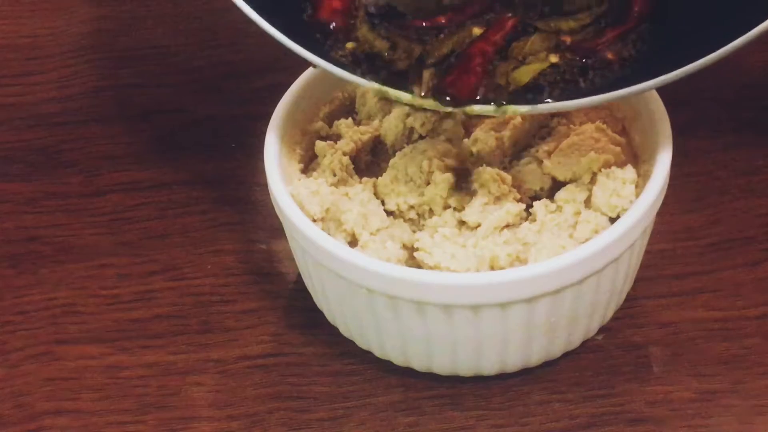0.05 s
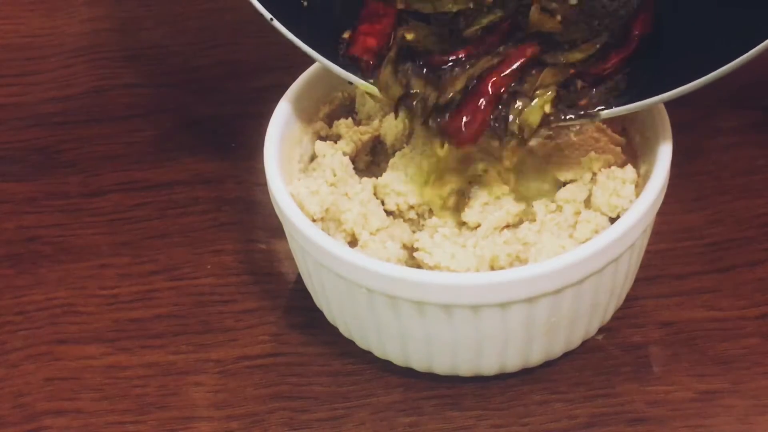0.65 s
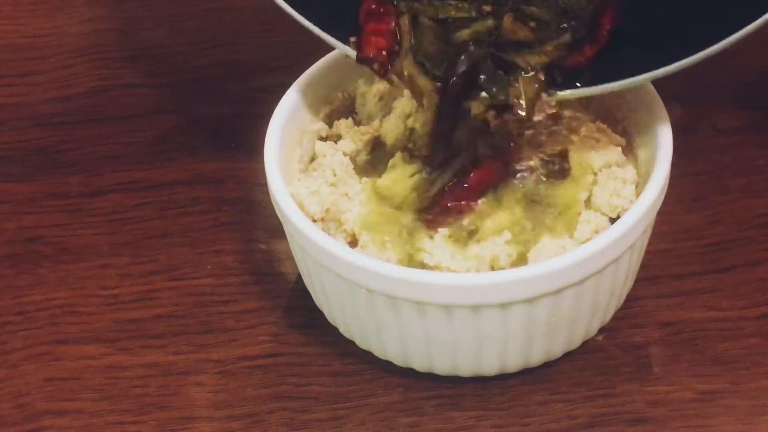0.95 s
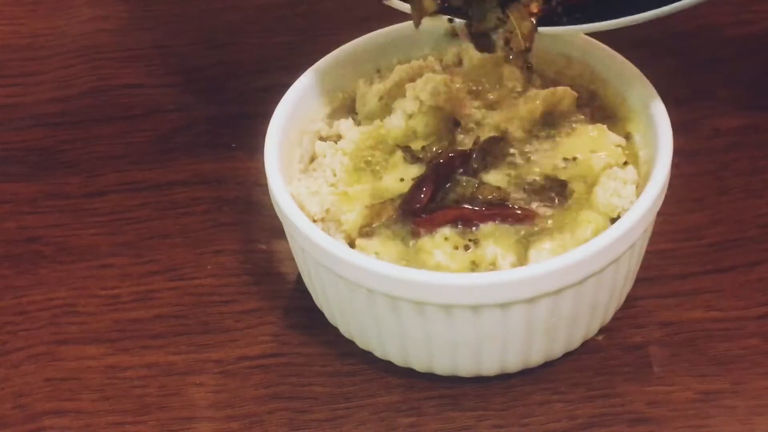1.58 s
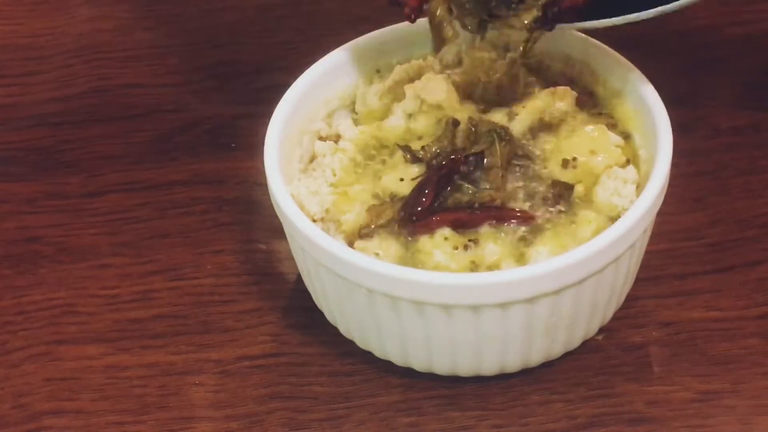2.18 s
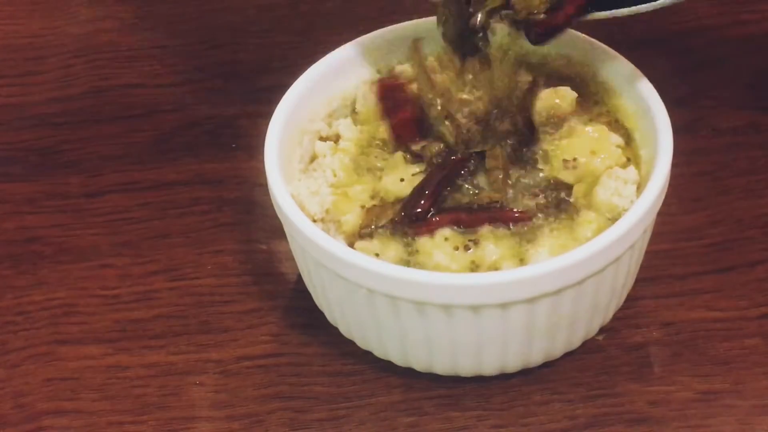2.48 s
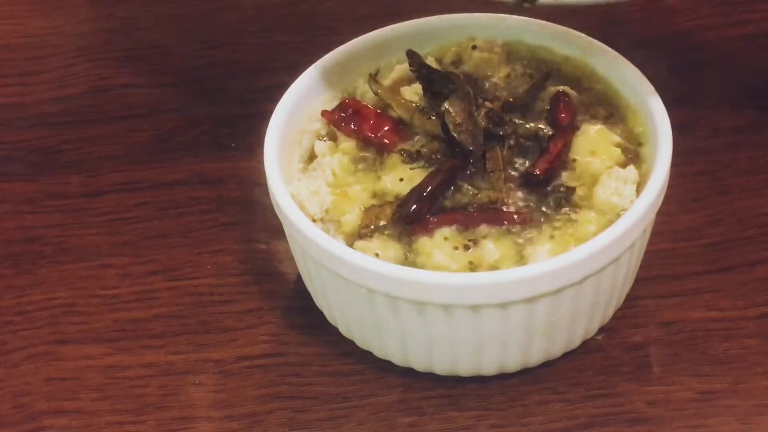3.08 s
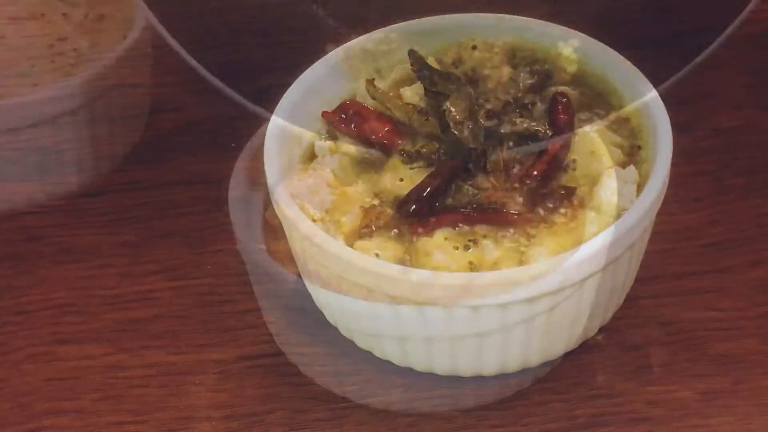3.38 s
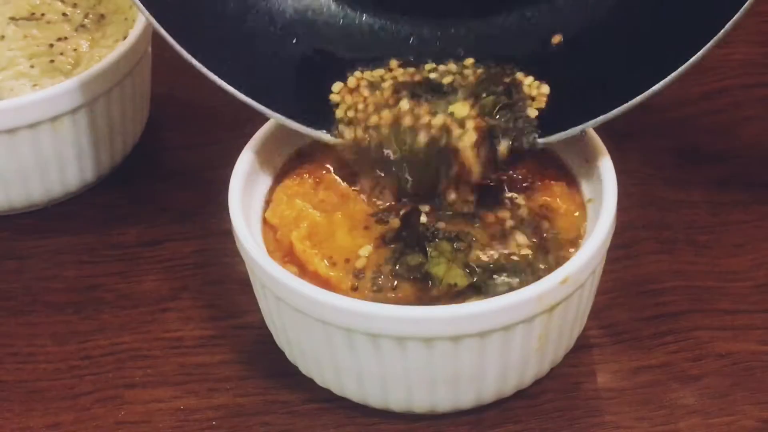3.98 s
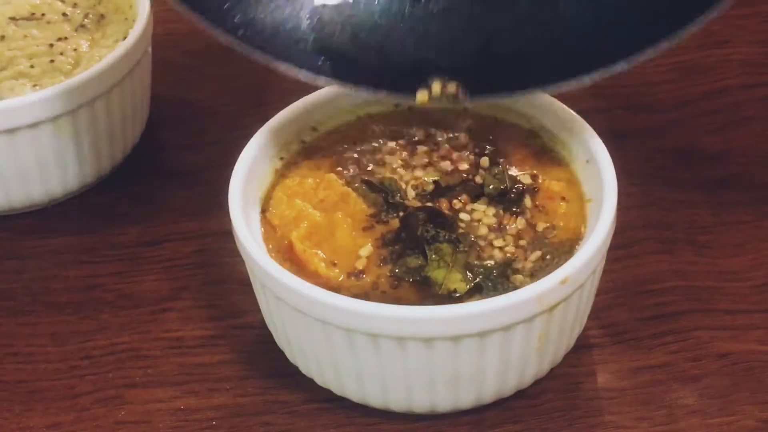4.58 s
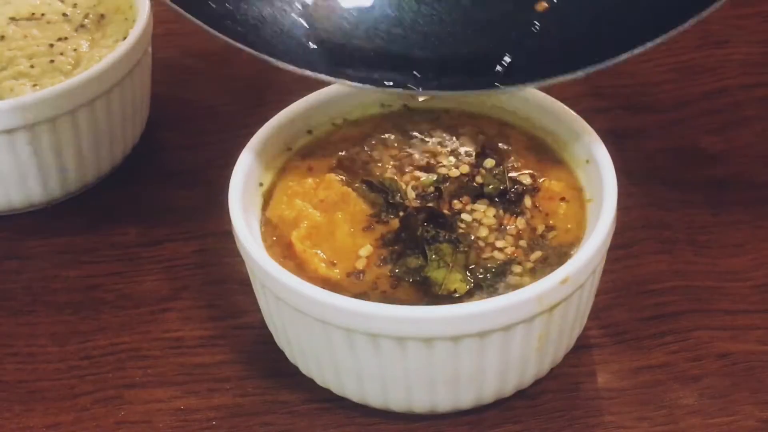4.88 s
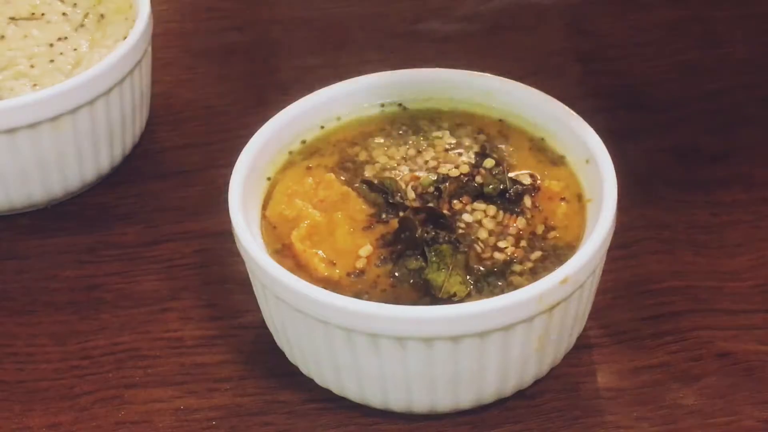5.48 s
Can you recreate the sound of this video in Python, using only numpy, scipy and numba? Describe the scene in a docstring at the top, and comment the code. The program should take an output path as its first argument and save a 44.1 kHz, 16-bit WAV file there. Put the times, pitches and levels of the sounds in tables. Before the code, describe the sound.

Hot oil and spices hit moist chutney with a fierce hiss, surging several times as tiny bubbles crackle and larger drops pop. A few dull knocks on the table come about halfway through. The sizzling carries on as a second small bowl gets its oil, with a slightly hollow ring under the pan, then dies down to scattered spitting. The microphone is close, with low kitchen room noise behind.

```python
"""Kitchen, close up: hot spiced oil is tipped from a pan onto wet chutney in one small bowl, then another.
Water flashes to steam in thousands of tiny bursts that thin to a crackle as the oil cools.
Larger drops spit; the hollow of the bowl and the air gap under the pan ring with the bubbles.
The pan drones as spices slide off and something bumps the table.
Low room noise lies behind it all, with an appliance hum during the second pour."""
import sys
import numpy as np
from scipy import signal
from scipy.fft import rfft, irfft
from scipy.io import wavfile
from scipy.ndimage import uniform_filter1d
from numba import njit

SR = 44100
rng = np.random.default_rng(int(sys.argv[2]) if len(sys.argv) > 2 else 0)


def waveform_to_disk(signal):
    """Save audio, clipped to [-1, 1], as 16-bit WAV at the path in sys.argv[1]."""
    frames = np.transpose(np.atleast_2d(signal))
    scaled = np.clip(frames, -1, 1) * 32767
    samples = np.round(scaled).astype(np.int16)
    wavfile.write(sys.argv[1], SR, samples)


N = 244490
T = np.arange(N) / SR
STEADY_BOIL_DB = -25  # reference for burst rate and treble
# how low the pan hangs over the bowl: (time [s], cover [0-1])
PAN_COVER = [(0.1, 0), (0.45, 0.06), (0.9, 0.25), (1.6, 0.08), (3.0, 0.45), (3.43, 0.57), (3.8, 0.5),
             (4.1, 0.87), (4.18, 0.93), (4.5, 1), (4.56, 0.34), (5.5, 0.33)]


def undb(db):
    """Decibels to gain."""
    return 10 ** (np.asarray(db) / 20)


def unit(x):
    """Scale to rms 1."""
    return x / np.sqrt(np.mean(x ** 2))


def convolve(x, response):
    """Apply an impulse response."""
    return signal.fftconvolve(x, response)[:N]


def colour(x, points, size=8192):
    """Minimum-phase filter through (frequency [Hz], gain [dB]) points."""
    hz, db = np.transpose(points)
    log_gain = np.log(undb(np.interp(np.log(np.fft.rfftfreq(size, 1 / SR) + 1), np.log(hz), db)))
    cepstrum = irfft(log_gain)[:size // 2]
    cepstrum[1:] *= 2
    return convolve(x, irfft(np.exp(rfft(cepstrum, size))))


def resonate(x, modes):
    """Parallel resonances: (centre [Hz], width [Hz], gain [dB])."""
    return sum(undb(db) * signal.lfilter(*signal.iirpeak(hz, hz / width_hz, fs=SR), x)
               for hz, width_hz, db in modes)


@njit
def sweep(x, hz, width_hz):
    """Moving resonance, gain 1 at its centre."""
    y, band, low = np.empty(len(x)), 0., 0.
    for i in range(len(x)):
        g, damping = np.tan(np.pi * hz[i] / SR), width_hz[i] / hz[i]
        v = (band + g * (x[i] - low)) / (1 + g * (g + damping))
        band, low, y[i] = 2 * v - band, low + 2 * g * v, damping * v
    return y


def walk(rate_hz):
    """Smooth random drift, spread near 1."""
    knots = rng.standard_normal(4096)
    return 1.2 * np.interp(T * rate_hz, np.arange(len(knots)), knots)


def flare(start_s, db, rise_s, decay_db_per_s):
    """Power envelope: swell, then exponential decay."""
    age_s = T - start_s
    return (np.clip(age_s / rise_s, 0, 1) * undb(db - decay_db_per_s * np.maximum(age_s - rise_s, 0))) ** 2


def background(second):
    """Low room noise; an appliance hums during the second pour."""
    # room noise spectrum in each pour: (frequency [Hz], gain [dB])
    first_spectrum = [(20, -10), (55, -1.5), (100, -5.5), (142, 5), (175, -1.5), (240, -5.5), (290, 3),
                      (370, -9), (440, -2), (650, -16.5), (1200, -18), (2500, -30), (7000, -23),
                      (15000, -38)]
    second_spectrum = [(20, -15), (70, 2), (115, -2.5), (170, -6), (250, -7.5), (340, -10.5), (450, -17),
                       (650, -16.5), (1200, -40)]
    first_air = undb(-46) * unit(colour(rng.standard_normal(N), first_spectrum))
    second_air = undb(-52) * unit(colour(rng.standard_normal(N), second_spectrum))
    hum_hz, hum_db = 117.7, -50.5
    hum = undb(hum_db + .33 * walk(8)) * unit(np.sin(2 * np.pi * hum_hz * T))
    return np.sqrt(1 - second) * first_air + np.sqrt(second) * (second_air + hum)


def drain_db(start_s):
    """Once the pour that fed a splash ends, its boil drops, then soaks away."""
    pour_ends_s = (3.096, 4.411)
    drop_db, drop_s, soak_db_per_s = 2.5, .1, 1.5
    end_s = min([s for s in pour_ends_s if s > start_s], default=np.inf)
    unfed_s = np.maximum(T - end_s, 0)
    return -drop_db * np.minimum(unfed_s / drop_s, 1) - soak_db_per_s * unfed_s


def boil():
    """Each splash of oil boils up and cools; returns fizz, mid and large bubble levels in dB."""
    # oil splashes: (time [s], fizz [dB], rise [s], cooling [dB/s], mid [dB re fizz], large [dB re fizz])
    splashes = [(0.098, -26, 0.079, 151, -10, -17.6), (0.223, -21.5, .13, 3, -7.5, -13.5),
                (0.572, -30, 0.14, 21, 2.5, -2.4), (0.759, -17.2, 0.12, 65, -10, -23),
                (0.858, -23.5, .025, 54, -2, -6), (0.895, -21, 0.2, 11.5, -9, -12.5),
                (2.05, -28.5, .19, 10, -6.2, -7.5), (2.487, -28, .13, 10.5, -7, -11),
                (2.923, -26.5, 0.12, 16, -13.5, -12), (3.47, -26.9, 0.49, 9.5, -10.5, -16.5),
                (4.108, -25, .04, 15, -6, -15), (4.287, -27.5, 0.13, 27, -13, -10),
                (4.573, -30.4, 0.068, 50, -15, -8), (4.741, -31.9, 0.09, 52, -10, -14.7),
                (5.02, -37.5, .05, 4.5, -9.5, -13)]
    lag_s = .042  # bigger bubbles build up more slowly
    power = np.zeros((3, N))
    for start_s, db, rise_s, cooling, mid_db, large_db in splashes:
        level_db = db + drain_db(start_s)
        power[0] += flare(start_s, level_db, rise_s, cooling)
        power[1:] += undb([[mid_db], [large_db]]) ** 2 * flare(start_s, level_db, rise_s + lag_s, cooling)
    return 10 * np.log10(power + 1e-12)


@njit
def pops(start_s, hz, cycles, size):
    """Each pop is a sine that falls to 1/e in its number of cycles."""
    out = np.zeros(N)
    for k in range(len(start_s)):
        first, z = int(start_s[k] * SR), size[k] + 0j
        pole = np.exp((2j * np.pi - 1 / cycles[k]) * hz[k] / SR)
        for i in range(first, min(N, first + int(6 * cycles[k] * SR / hz[k]))):
            z *= pole
            out[i] += z.imag
    return out


def steam(x, db, decay_s):
    """Hiss that follows the power of the pops and dies away after them."""
    pole = np.exp(-1 / (decay_s * SR))
    power = signal.lfilter([1 - pole], [1, -pole], x ** 2)
    return undb(db) * np.sqrt(power) * rng.standard_normal(N)


def bursts(fizz_db, low_hz, high_hz, share, cycles, spread_db, steam_db, count=70000):
    """Random bubbles with steam, many small, few large; denser in a fierce boil, at level mean power."""
    when, chance, pitch, ring, size_rank = rng.random((count, 5)).T
    start_s = when * T[-1]
    rate_per_s = share * 5200 * undb(np.interp(start_s, T, fizz_db) - STEADY_BOIL_DB) ** 1.55
    alive = chance < np.minimum(rate_per_s * T[-1] / count, share)
    hz = low_hz + (high_hz - low_hz) * pitch
    ring_cycles = cycles * 2 ** (4 * ring - 2)
    size = undb(-spread_db * np.log(size_rank + .028)) * np.sqrt(hz / ring_cycles)
    x = pops(start_s[alive], hz[alive], ring_cycles[alive], size[alive])
    x = x + steam(x, steam_db, decay_s=.006)
    power = uniform_filter1d(x ** 2, size=3500)
    return x / np.sqrt(np.abs(power) + np.mean(power) / 1000)


def sizzle(second, fizz_db, mid_db, large_db):
    """Bubbles crackle and boil in spurts; the largest ring the hollow of the bowl."""
    # spectra of fine, mid and large bubbles: (frequency [Hz], gain [dB])
    fizz_spectrum = [(3500, -32), (4900, -22), (5600, -7), (6500, 0), (7100, -1), (7650, -3), (8600, -2),
                     (9700, -3), (10400, -7.5), (11200, -5), (12800, -3.5), (15800, -5.5)]
    mid_spectrum = [(1500, -38.5), (2300, -6.5), (2800, -6), (3200, 0.5), (3650, -0.5), (4150, 1.5),
                    (4600, 0), (5100, -2.5), (6500, -25)]
    large_spectrum = [(40, -40), (150, -31), (350, -15.5), (800, -11.5), (1350, -8.5), (1700, -9),
                      (2600, -1), (3100, -6), (5000, -36.5)]
    # hollow of each bowl: (centre [Hz], width [Hz], gain [dB])
    first_modes = [(694, 55, -11), (1020, 35, -4), (1725, 140, 2), (1949, 37, 4)]
    second_modes = [(685, 51, -14), (1474, 14, -5), (1684, 54, -5)]
    crackle = bursts(fizz_db, 2250, 16200, share=.9, cycles=1., spread_db=5., steam_db=-2.5)
    ringing = undb(-5.5) * bursts(fizz_db, 2500, 12056, share=.5, cycles=13.5, spread_db=4.5, steam_db=-3)
    fizz = unit(colour(crackle + ringing, fizz_spectrum))
    # a fierce boil is duller, the second bowl brighter
    treble_db = np.minimum(.52 * (STEADY_BOIL_DB - fizz_db), 1.8) + .6 * second
    treble = signal.sosfiltfilt(signal.butter(4, 10000, "highpass", fs=SR, output="sos"), fizz)
    fizz = fizz + (undb(treble_db) - 1) * treble
    mid = unit(colour(1.14 * crackle + ringing, mid_spectrum))
    large = bursts(fizz_db, 290, 3290, share=.45, cycles=1.57, spread_db=2., steam_db=3.5)
    gurgle = colour(large, large_spectrum)
    first_bowl = undb(-1.5) * unit(gurgle + resonate(large, first_modes))
    second_bowl = undb(-3) * unit(gurgle + resonate(large, second_modes))
    hollow = (1 - second) * first_bowl + second * second_bowl
    spurts_db = .5 * walk(45)
    return undb(spurts_db) * (undb(fizz_db) * fizz + undb(mid_db) * mid + undb(large_db) * hollow)


def air_gap(second, fizz_db, large_db):
    """Bubbles and froth ring the air between pan and bowl, higher and louder as the pan comes down."""
    # collapsing froth clumps: (time [s], level [dB], rise [s], decay [dB/s])
    clumps = [(0.17, -46, .05, 30), (0.32, -30, 0.12, 38), (3.414, -38.5, 0.011, 133),
              (4.135, -38, .03, 31), (4.53, -48, 0.026, 20), (5.34, -48.5, 0.05, 99.5)]
    cover = np.interp(T, *np.transpose(PAN_COVER))
    power = undb(large_db - 14.5 + 14 * cover) ** 2 + sum(flare(*clump) for clump in clumps)
    froth = bursts(fizz_db, 1000, 3100, share=.44, cycles=1., spread_db=2.5, steam_db=-7)
    open_hz = np.interp(second, [0, 1], [1756, 1395])
    hz = (open_hz + 905 * cover) * (1 + .025 * walk(60))
    width_hz = 290 + 400 * cover
    ring = sweep(sweep(froth, hz, width_hz), hz, width_hz) / np.sqrt(width_hz)
    return unit(ring) * np.sqrt(power) * undb(1.1 * walk(35))


def under_pan(x):
    """A low pan throws back a short echo and shuts in a ringing space."""
    # upper resonances under the pan: (centre [Hz], width [Hz], gain [dB])
    modes = [(3200, 280, -12.5), (5960, 370, -19), (8400, 880, -9.5)]
    cover = np.interp(T, *np.transpose(PAN_COVER))
    delay_s = .000395
    echo = -.2 * np.interp(T - delay_s, T, x)
    return (x + cover * (echo + resonate(x, modes))) * undb(-.9 * cover)


def kitchen_reverb(x, tail_db, t60_s):
    """Add the faint tail of the room."""
    t = T[:SR // 2]
    tail = rng.standard_normal(len(t)) * undb(-60 * t / t60_s) * (t > .006)
    return x + convolve(x, undb(tail_db) * tail / np.linalg.norm(tail))


def spits():
    """Larger water drops burst singly, each with a puff of steam."""
    # bursting drops: (time [s], level [dB], pitch [Hz], decay [cycles])
    drops = [(0.139, -14, 12700, 7.4), (0.235, -25, 2760, 6), (0.291, -12.5, 5350, 18),
             (0.2907, -13, 4090, 17), (0.3405, -19, 2960, 4.2), (1.9194, -9, 6230, 6),
             (1.9766, -0.5, 10500, 1.1), (2.24, -15, 4050, 3.8), (2.269, -10, 6490, 4),
             (2.3494, -12, 9140, 3.3), (2.378, -10.5, 7600, 1.8), (2.7238, -8.5, 7060, 8.6),
             (2.7657, -5.5, 7500, 3), (3.308, -12, 8700, 5.1), (3.478, -21, 6700, 8),
             (3.576, -21.5, 4860, 6.2), (3.594, -25, 4300, 7.2), (3.8190, -11, 6080, 17),
             (4.113, -20, 1084, 0.4), (4.135, -6, 7200, 3.1), (4.733, -27, 950, 0.64),
             (4.7745, -13, 6260, 3.8), (4.8035, -18, 3320, 3), (5.0045, -12.5, 6900, 4.2),
             (5.1901, -10, 10400, 4.6), (5.207, -19, 7000, 4.9), (5.2518, -14, 8950, 7.9),
             (5.2700, -15, 7600, 2.5), (5.36, -17, 8800, 4), (5.4037, -13, 13200, 7),
             (5.4565, -19, 6530, 4), (5.5247, -14.5, 7840, 3.8)]
    # steam spectrum: (frequency [Hz], gain [dB])
    puff_spectrum = [(800, -44), (1800, -34), (3500, -5.5), (7000, .5), (15000, -10)]
    start_s, db, hz, cycles = np.array(drops, float).T.copy()
    snaps = pops(start_s, hz, cycles, undb(db))
    return snaps + colour(steam(snaps, db=-1, decay_s=.0012), puff_spectrum)


def pan_drone():
    """The pan's lowest mode swells and fades as each lot of spices slides over it."""
    # spice slides: (time [s], length [s], level [dB], mid-slide pitch [Hz], glide [Hz/s])
    slides = [(0.575, .12, -39, 202, -60), (0.7, .125, -41.5, 210, 229), (0.825, .1, -42, 198, -50),
              (0.985, .085, -40, 197.6, -58), (1.14, 0.16, -43, 199, 150)]
    out = np.zeros(N)
    for start_s, length_s, db, hz, glide_hz_per_s in slides:
        age_s = np.clip(T - start_s, 0, length_s)
        pitch_hz = hz + glide_hz_per_s * (age_s - length_s / 2)
        swell = undb(db) * np.sin(np.pi * age_s / length_s)
        out += swell * np.sin(2 * np.pi * np.cumsum(pitch_hz) / SR)
    return out


def table_bumps():
    """Soft bumps ring the wooden top, each with a dull scuff."""
    # bumps: (time [s], thud [dB], scuff [dB], scuff decay [s])
    bumps = [(3.017, -46, -32.5, .03), (3.033, -33.5, -31, 0.06), (3.0652, -27, -47.5, .03),
             (3.111, -28.5, -41, 0.033), (3.197, -38, -52, 0.016), (3.3, -58, -45, 0.099),
             (4.789, -44, -25, 0.0024)]
    # table top modes: (frequency [Hz], level [dB], t60 [s])
    modes = [(84.4, 2, 0.28), (121, -5, 0.1), (169, -17, 0.12), (248, -1.5, 0.13)]
    # scuff spectrum: (frequency [Hz], gain [dB])
    scuff_spectrum = [(30, -5), (100, 11.5), (280, -4.5), (450, -2.5), (800, -2.5), (1200, 4.5), (1700, -5),
                      (2800, -24), (6000, -51)]
    thuds, scuff_gain = np.zeros(N), np.zeros(N)
    for start_s, thud_db, scuff_db, decay_s in bumps:
        age_s = np.maximum(T - start_s, 0)
        ring = sum(undb(db - 60 * age_s / t60_s) * np.sin(2 * np.pi * hz * age_s)
                   for hz, db, t60_s in modes)
        thuds += undb(thud_db) * ring
        scuff_gain += undb(scuff_db) * np.exp(-age_s / decay_s) * (1 - np.exp(-age_s / (.13 * decay_s)))
    return thuds + scuff_gain * unit(colour(rng.standard_normal(N), scuff_spectrum))


def scene():
    """Two pours, mono; the first bowl gives way to the second a little past the middle."""
    second = np.clip((T - 3.2) / .63, 0, 1)  # 0 = first bowl, 1 = second
    fizz_db, mid_db, large_db = boil()
    bubbling = under_pan(sizzle(second, fizz_db, mid_db, large_db)) + air_gap(second, fizz_db, large_db)
    frying = kitchen_reverb(bubbling + spits(), tail_db=-13, t60_s=.3)
    return (frying + table_bumps() + pan_drone() + background(second))[None]


def record(dry):
    """Cut the deepest bass and the top."""
    low_hz, top_hz = 18, 15800
    dry = signal.sosfilt(signal.butter(2, low_hz, "highpass", fs=SR, output="sos"), dry)
    return signal.sosfilt(signal.ellip(12, .1, 80, top_hz, fs=SR, output="sos"), dry)


dry = scene()
out = record(dry)
waveform_to_disk(out)
```